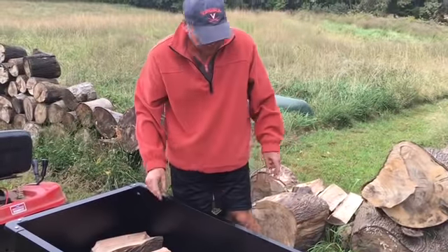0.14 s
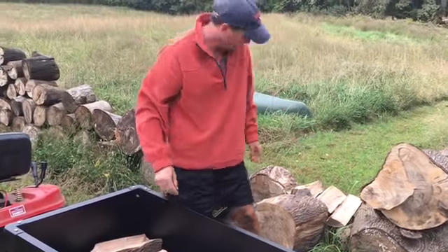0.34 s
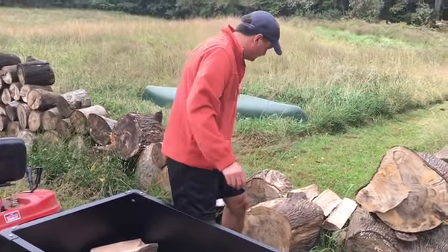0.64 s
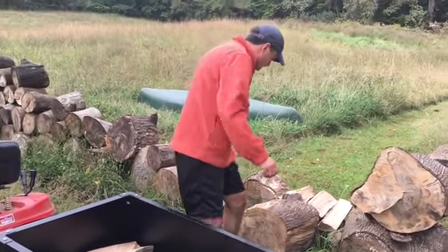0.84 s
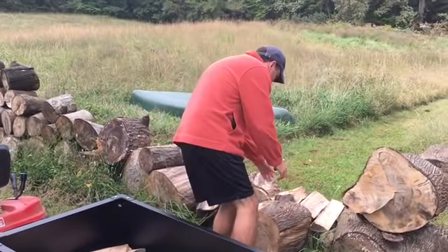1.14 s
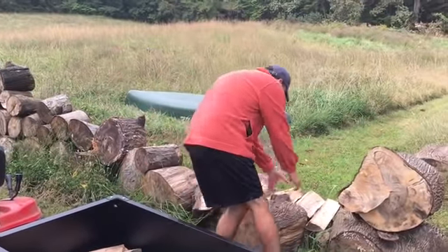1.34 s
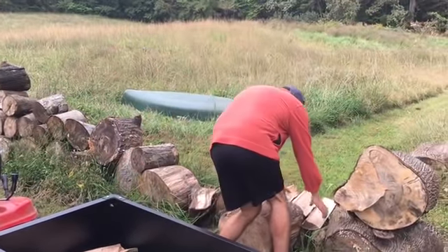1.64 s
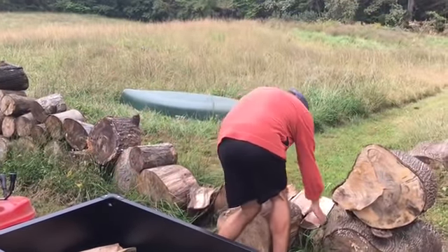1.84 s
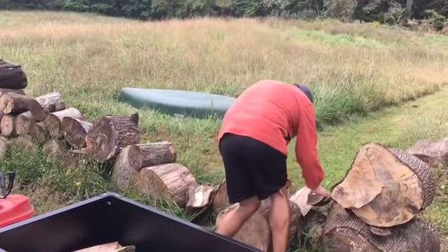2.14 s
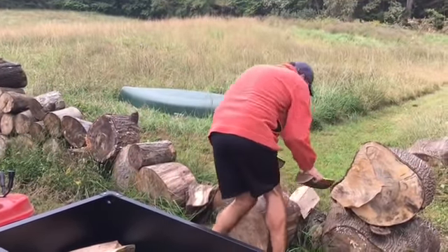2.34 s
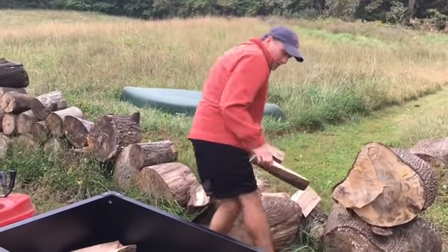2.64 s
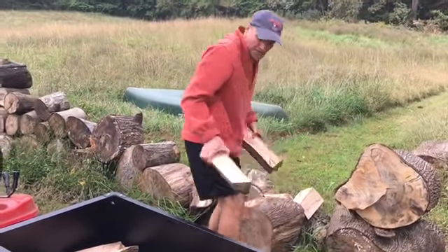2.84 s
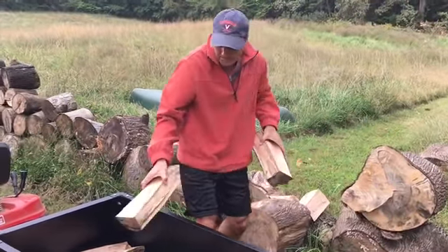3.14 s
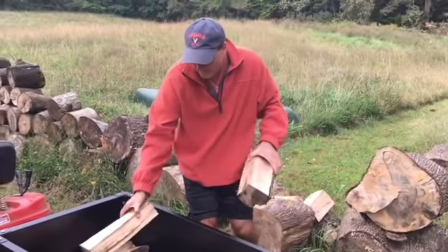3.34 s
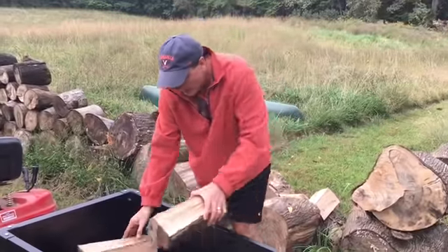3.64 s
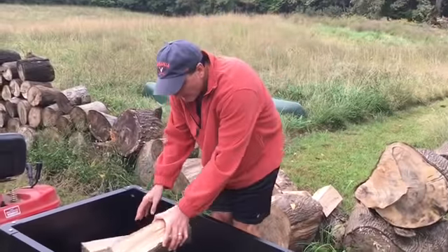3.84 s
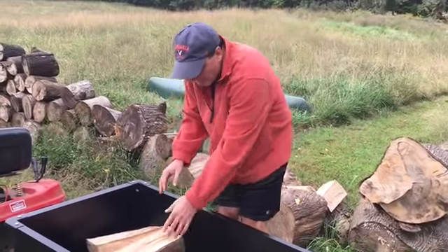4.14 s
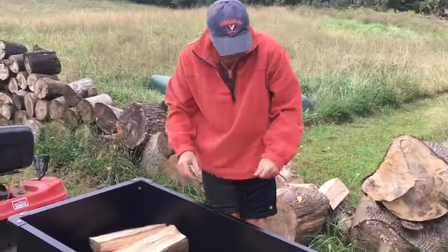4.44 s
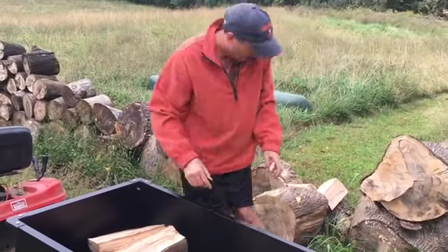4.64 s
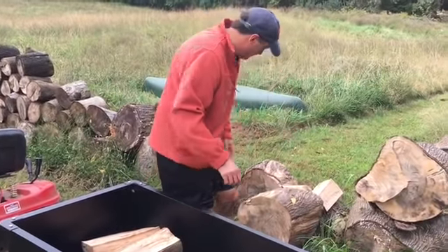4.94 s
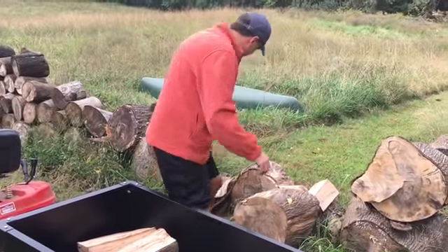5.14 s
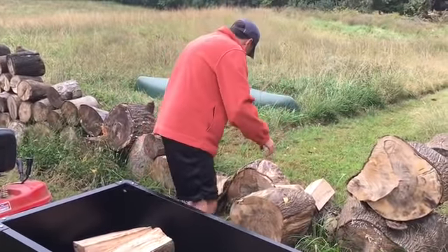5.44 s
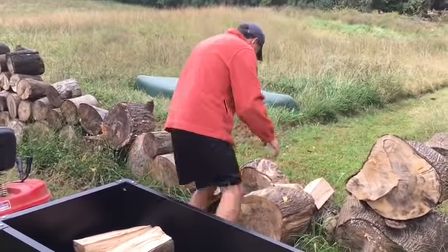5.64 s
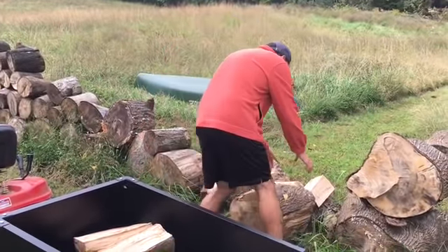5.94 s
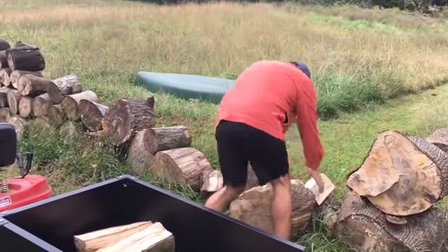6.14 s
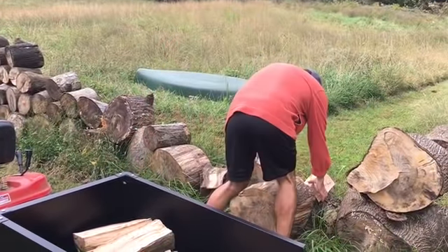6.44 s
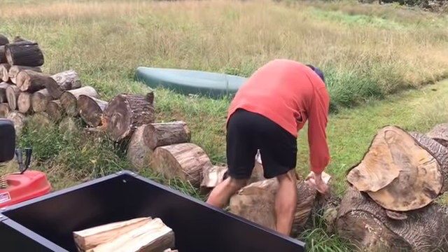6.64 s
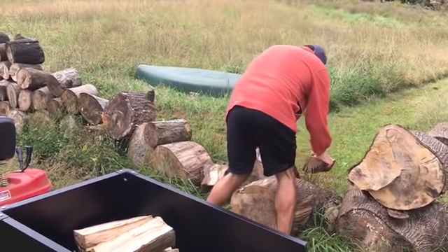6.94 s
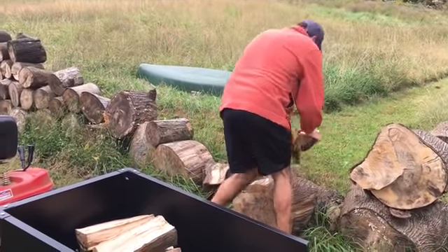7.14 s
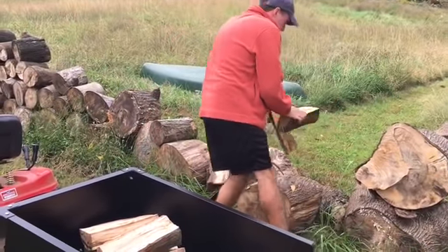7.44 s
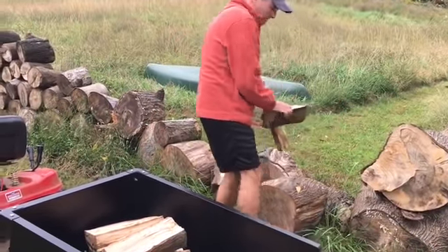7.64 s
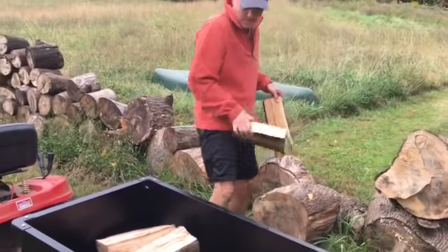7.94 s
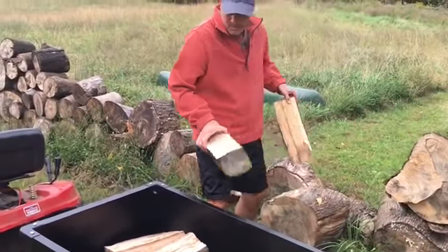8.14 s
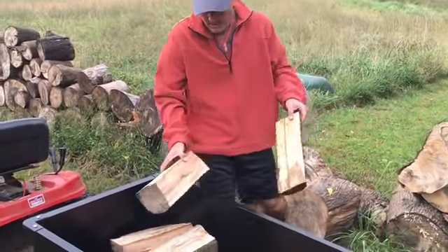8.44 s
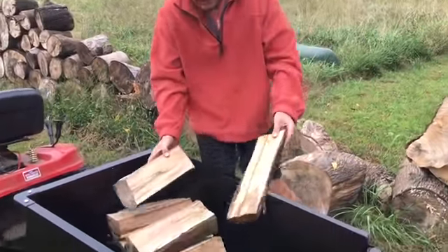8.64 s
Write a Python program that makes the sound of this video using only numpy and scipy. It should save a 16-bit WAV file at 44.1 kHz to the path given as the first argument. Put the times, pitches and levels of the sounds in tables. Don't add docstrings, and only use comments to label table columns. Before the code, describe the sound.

Two split logs drop into a steel cart with heavy booming clangs, then wood knocks, grass rustle, crickets and scattered bird calls outdoors.

```python
import sys
import numpy as np
from scipy import signal
from scipy.fft import rfft, irfft, next_fast_len
from scipy.io import wavfile
from scipy.ndimage import map_coordinates

SR = 44100
rng = np.random.default_rng(int(sys.argv[2]) if len(sys.argv) > 2 else 0)


def unload_wav(signal):
    wavfile.write(
        sys.argv[1],
        SR,
        np.round(np.clip(np.atleast_2d(signal).T, -1, 1) * 32767).astype(np.int16),
    )


def amp(db):
    return 10 ** (np.asarray(db, float) / 20)


N = 387638


def rms_one(x):
    return x / np.sqrt(np.mean(x ** 2) + 1e-20)


def at_hz(points, hz):
    table_hz, values = np.array(points).T[:2]
    return np.interp(np.log(hz), np.log(table_hz), values)


def in_time(rows):
    s, *columns = np.transpose(rows)
    return [np.interp(np.arange(N) / SR, s, column) for column in columns]


def gate(rows, fade=0.0027):
    t = np.arange(N) / SR
    start, end = rows[0][0], rows[-1][0]
    return np.clip(np.minimum(t - start + (start == 0), end - t) / fade, 0, 1)


def coloured(x, spectrum):
    size = next_fast_len(N)
    hz = np.maximum(np.arange(size // 2 + 1) * SR / size, 1)
    return rms_one(irfft(rfft(x, size) * amp(at_hz(spectrum, hz)), size)[:N])


def drift(rate):
    knots = rng.standard_normal(400)
    return map_coordinates(knots, [np.arange(N) / SR * rate], order=3, mode="wrap")


def grains(per_s, spread_db):
    sizes = amp(spread_db * np.minimum(rng.exponential(1, N), 5)) * rng.choice([-1, 1], N)
    return sizes * (rng.random(N) < per_s / SR)


def ring(clicks, hz, t60):
    r, w = amp(-60 / (t60 * SR)), 2 * np.pi * hz / SR
    return signal.lfilter([0, np.sin(w)], [1, -2 * r * np.cos(w), r * r], clicks + 1e-18)


def bands(x, low_hz, per_octave=3):
    steps = np.arange(per_octave * np.log2(16000 / low_hz) + 1)
    edges = low_hz * 2 ** (steps / per_octave)
    for k, (low, high) in enumerate(zip(edges, edges[1:])):
        sign = (-1) ** k
        sos = signal.butter(2, [low, high], "band", fs=SR, output="sos")
        yield np.sqrt(low * high), sign * signal.sosfilt(sos, x)


def echoes(x, level_db, t60):
    t = np.arange(SR // 2) / SR
    tail = rng.standard_normal(len(t)) * amp(-60 * t / t60) * (t > .01)
    return x + amp(level_db) * signal.fftconvolve(x, tail / np.sqrt(np.sum(tail ** 2)))[:N]


# f/Hz, level/dB per Hz
AIR_SPECTRUM = [(13, -42), (22, 0), (143, 3), (217, -10), (278, -9), (469, -25), (1760, -29), (2660, -36.5),
                (3510, -25), (4370, -36.5), (5920, -26), (7800, -22), (8480, -28), (10300, -38.5),
                (16000, -33)]


def air(level_db=-41):
    floor = coloured(rng.standard_normal(N), AIR_SPECTRUM)
    lows = signal.sosfilt(signal.butter(2, 350, fs=SR, output="sos"), floor)
    lumps = amp(1.5 * drift(7.0) + 1.0 * drift(1.5)) - 1
    return amp(level_db) * (floor + lows * lumps)


# f/Hz, width/Hz, level/dB
FAR_INSECTS = [(5944, 590, -58), (7250, 290, -62), (7800, 80, -79)]


def chorus():
    out = 0
    for hz, width, db in FAR_INSECTS:
        b, a = signal.butter(1, [hz - width / 2, hz + width / 2], "band", fs=SR)
        band = signal.lfilter(b, a, signal.lfilter(b, a, rng.standard_normal(N)))
        out = out + amp(db + 2.2 * drift(13.0)) * rms_one(band)
    return out


def trill(level_db=-50, per_s=53.9, duty=0.6):
    turn = (np.cumsum(per_s + .15 * drift(1.5)) / SR + .45) % 1 / duty
    arch = np.sin(np.pi * np.minimum(turn, 1))
    hz = 8200 + 450 * arch + 30 * drift(45)
    return amp(level_db + 0.45 * drift(2.97)) * arch * np.sin(2 * np.pi * np.cumsum(hz) / SR)


# t/s, thud level/dB, ring level/dB, brightness/dB per octave
LOG_BLOWS = [(0.0, -54, -33.5, 1), (3.650, -31.5, -36.5, -1.5), (3.663, -31.5, -47, 0.5),
             (3.693, -38, -28.5, -4.5), (3.734, -17.5, -91, -6), (3.751, -25, -27, -0.5),
             (3.769, -11.5, -28.5, -5.5), (3.785, -46, -72, 3.5), (3.81, -23, -29.5, -4),
             (3.959, -47, -30.5, -14), (4.085, -17.5, -28, 1), (4.092, -16, -30.5, 0),
             (4.112, -6.5, -33.5, -1), (4.148, -22.5, -39, 2), (4.174, -14.5, -29, -1.5),
             (4.215, -20, -26.5, -1.5), (4.254, -21, -27, -1), (4.29, -54, -35, 4.5),
             (4.345, -23.5, -32.5, -2), (4.43, -50, -31.5, -1)]


def blow_clicks(hz, level_db):
    s, thud_db, ring_db, bright = np.transpose(LOG_BLOWS)
    clicks = np.zeros((2, 6 * SR))
    strength_db = np.array([ring_db, thud_db]) + level_db + bright * np.log2(hz / 200)
    clicks[:, np.round(s * SR).astype(int)] = amp(strength_db)
    return clicks


BED_MODE_HZ = [162, 199, 269, 296, 382, 404, 544, 576, 515, 781, 905, 1050, 1071, 1245, 1394, 1518, 1545,
               1642, 1690, 1733, 1798, 1838, 2121, 2170, 2288, 2428, 2503, 3865, 4054]
# level/dB under the first, second and last log, t60/s
BED_MODES = [(6.5, 0, 0.5, 0.75), (-24, -6, -6, 0.7), (-5, -32, -2, 1.2), (-4, -9, -8, 1.1),
             (-6, 0, -9, 0.9), (0, -11, -2, 1.4), (-6, -15, -16, 1.3), (-16, -13, -30, 1.9),
             (-20, -14, -12, 1.5), (-18, -43, -34, 2), (-21.5, -22, -29, 1.6), (-33, -30, -25.5, 1.8),
             (-15.5, -45, -40, 1.4), (-24, -42, -41, 2.8), (-36, -38, -21, 1.2), (-4, -44, -14, 1.1),
             (-19, -42, -31, 1.2), (-21, -33, -29, 1.2), (-21, -25, -22, 1.4), (-12, -22, -26, 1.1),
             (-24, -31, -36, 3.2), (-26, -4, -13, 1), (-16, -44, -24, 1.6), (-23, -21, -13, 0.8),
             (-31, -29, -35, 2.2), (-4, -9, -14, 0.55), (-42, -28, -23, 0.8), (-32, -31, -22, .4),
             (-35, -35, -27, .55)]
# f/Hz, level/dB
SHEET_LEVEL = [(29, -48), (50, -13.5), (119, -13), (176, 0), (229, -7), (266, -2), (649, -17.5),
               (1840, -20.5), (2610, -25.5), (3940, -32.5), (9000, -48), (11700, -73), (19800, -120)]
# f/Hz, t60/s
SHEET_DECAY = [(60, 1), (200, 1), (600, 1), (2000, 0.67), (4000, 0.69), (9000, 0.22)]


def cart(damped=0.2, scatter_db=4.0, contact=0.0035):
    last_log_s, waver_per_s = 4.0, 20
    out, at = np.zeros(N), [round(row[0] * SR) for row in LOG_BLOWS]
    first, second = at[0], slice(at[0] + 1, round(last_log_s * SR))
    modes = [(hz, *row) for hz, row in zip(BED_MODE_HZ, BED_MODES)]
    for hz in np.geomspace(70, 800, 52) * amp(rng.normal(0, 0.1414, 52)):
        weak_db = at_hz(SHEET_LEVEL, hz) - np.log2(hz / 200)
        modes.append((hz, weak_db, weak_db, weak_db, 0.98 * at_hz(SHEET_DECAY, hz)))
    chance = rng.standard_normal((len(at), len(modes), 2))
    coarse_s = np.arange(6 * SR // 64 + 1) * 64 / SR
    rocking = map_coordinates(chance[1:].ravel(), [coarse_s * waver_per_s], order=3)
    for k, (hz, first_db, second_db, later_db, t60) in enumerate(modes):
        clicks = blow_clicks(hz, later_db)
        luck = chance[:, k]
        clicks[:, at] *= (amp(scatter_db * (np.abs(luck) + 0.2)) * np.sign(luck)).T
        clicks[:, first] *= amp(first_db - later_db)
        clicks[:, second] *= amp(second_db - later_db)
        clicks[0, second] *= amp(-10 * (hz < 230))
        free, held = ring(clicks, hz, contact) * 2 * np.log(1000) / (contact * SR)
        depth_db = 1.5 if k < len(BED_MODES) else 3.5
        waver = np.repeat(amp(depth_db * (np.roll(rocking, 53 * k) - .5)), 64)[:6 * SR]
        thud = ring(held, hz, damped * at_hz(SHEET_DECAY, hz))
        out[:6 * SR] += waver * ring(free, hz, t60) + thud
    return signal.sosfilt(signal.butter(2, 95, "high", fs=SR, output="sos"), out)


def sheet_lines(count=500, blur_db=-5):
    spectrum = np.zeros(3 * SR + 1, complex)
    lines = (6 * rng.uniform(650, 6000, count)).astype(int)
    spectrum[lines] = rng.standard_normal(count) + 1j * rng.standard_normal(count)
    return 0.17 * rms_one(irfft(spectrum)) + amp(blur_db) * rng.standard_normal(6 * SR)


def clang(level_db=8, damped=0.27, rise=0.00034):
    out, swell = np.zeros(N), np.exp(-1 / (rise * SR))
    for hz, noise in bands(sheet_lines(), 315.0):
        band_db = at_hz(SHEET_LEVEL, hz) + level_db - 2 * (hz < 630)
        free, held = blow_clicks(hz, band_db) ** 2 + 1e-30
        fall = amp(-120 / (at_hz(SHEET_DECAY, hz) * SR))
        energy = signal.lfilter([1], [1, -fall], free)
        energy += signal.lfilter([1], [1, -fall ** (1 / damped)], held)
        energy = signal.lfilter([1 - swell], [1, -swell], energy)
        out[:6 * SR] += np.sqrt(energy * SR / 200) * noise
    return out


# f/Hz, level/dB per Hz
RATTLE_SPECTRUM = [(900, -14), (1700, -5), (2400, -5), (2900, -11), (3600, -6), (4050, 1), (4550, -7),
                   (6300, -5.5), (11000, -9), (16000, -16)]
# t/s, level/dB, t60/s, top against it/dB
WALL_JOLTS = [(0.0, -40, 0.3, -17), (3.645, -38, 0.14, -3), (3.702, -50.5, 0.29, 8), (3.735, -40, 0.08, 0),
              (3.745, -39, 0.033, 5), (3.752, -46, 1, -25), (3.771, -35.5, 0.081, -23),
              (4.084, -28, 0.18, -13), (4.106, -17.5, 0.057, -5), (4.13, -28, 0.77, -7),
              (4.146, -31.5, 0.26, -1), (4.183, -37, 0.36, -9), (4.232, -26.5, 0.43, -12),
              (4.28, -26, 0.3, -2.5), (4.341, -48.5, 0.14, -39)]


def rattle(rise_s=0.0042, settle=0.98, top_fall_db_per_s=106, top_floor_db=-45):
    contacts = grains(12000, spread_db=3.0) * amp(2.5 * drift(60))
    contacts = coloured(contacts, RATTLE_SPECTRUM)[:5 * SR]
    out, t = np.zeros(N), np.arange(SR // 2) / SR
    parts = list(bands(contacts, 1020, per_octave=2))
    for s, db, t60, top_db in WALL_JOLTS:
        i, on = round(s * SR), np.minimum(t / rise_s + (s == 0), 1)
        top = np.maximum(top_db - top_fall_db_per_s * t, top_floor_db)
        for hz, band in parts:
            share = np.log2(hz / 4800) / 1.36 * (hz > 4800)
            piece = band[i:i + len(t)]
            level = on * amp(db + 5.5 - 60 * (t / t60) ** settle + share * top)
            out[i:i + len(piece)] += piece * level[:len(piece)]
    return out


# t/s of the last pulse of a chirp, pulses
CRICKET_CHIRPS = [(.3155, 6), (.6473, 7), (.9616, 7), (1.262, 6), (1.5913, 6), (1.8923, 6), (2.1926, 6),
                  (2.5059, 6), (2.8140, 6), (3.1415, 7), (3.4592, 6), (3.77, 6), (4.0704, 6), (4.40, 6),
                  (4.7084, 6), (5.0146, 6), (5.31, 6), (5.6178, 6), (5.9229, 6), (6.2469, 7), (6.5322, 6),
                  (6.8327, 7), (7.1285, 7), (7.4396, 6), (7.7622, 6), (8.0567, 6), (8.3536, 6), (8.6635, 6)]


def tree_cricket(level_db=-45, top_hz=3820, fall_hz=620, length=0.01875):
    out, t = np.zeros(N), np.arange(round(length * SR)) / SR
    hz = top_hz - fall_hz * (t / length) ** 1.72
    pulse = np.sin(np.pi * (t / length) ** 1.65) * np.sin(2 * np.pi * np.cumsum(hz) / SR)
    chance = rng.standard_normal((len(CRICKET_CHIRPS), 9))
    for (last, count), luck in zip(CRICKET_CHIRPS, chance):
        for k in range(count):
            i = round((last - .0075 - .0228 * (count - 1 - k)) * SR)
            place = k + 6 - count
            swell_db = -6 * .3 ** place ** 2 - 4 * (place < 0)
            out[i:i + len(t)] += amp(level_db + swell_db + luck[k] + .7 * luck[-1]) * pulse
    return echoes(out, -44.5, 0.079)


# t/s of the peak, half length/s, swish level/dB, scuff level/dB
GRASS_MOVES = [(0.406, 0.2, -49.5, -53.5), (0.953, 0.21, -62, -61), (1.414, 0.2, -49.5, -56),
               (2.014, 0.32, -59.5, -59.5), (2.085, 0.059, -58, -66), (7.04, 0.064, -64, -96),
               (2.445, 0.1, -61, -61.5), (2.85, 0.12, -48, -62), (3.085, 0.38, -58.5, -58),
               (3.626, 0.1, -50, -57), (4.066, 0.014, -40, -53), (4.904, 0.21, -53, -56),
               (6.416, 0.013, -54, -72), (6.623, 0.022, -51.5, -78), (5.953, 0.15, -52.5, -58),
               (6.958, 0.044, -63, -51.5), (7.172, 0.25, -52, -62), (7.696, 0.13, -49.5, -55.5),
               (8.302, 0.16, -61, -56), (8.6, 0.21, -50, -53)]
# f/Hz, level/dB per Hz
SWISH_SPECTRUM = [(1500, -4), (2500, -3.5), (4500, 1), (7000, 1), (10000, -4), (15500, -5.5)]
# f/Hz, level/dB per Hz
SCUFF_SPECTRUM = [(300, 9), (600, 1), (1000, 9), (1800, 8), (2600, 2.5), (4000, -85)]


def rustle():
    stems = grains(6000, spread_db=2.5) * amp(1.8 * drift(25))
    swish = coloured(stems, SWISH_SPECTRUM)
    scuff = coloured(np.roll(stems, SR), SCUFF_SPECTRUM)
    s, half, swish_db, scuff_db = np.transpose(GRASS_MOVES)
    t = np.arange(0, N + 100, 100) / SR
    moves = amp(-9 * np.abs((t[:, None] - s) / half) ** 1.9)
    high = np.interp(np.arange(N) / SR, t, moves @ amp(swish_db))
    low = np.interp(np.arange(N) / SR, t, moves @ amp(scuff_db + 2.5))
    return high * swish + low * scuff


# t/s, peak level/dB, low push/dB, top crack/dB, strongest mode f/Hz
LOG_KNOCKS = [(0.97, -47.5, -4, 1, 1240), (2.002, -38, -28, 9, 2120), (2.0052, -43, -23, 7, 1170),
              (2.0222, -33.5, -38, 10, 1160), (2.049, -45, -20, -8, 1030), (2.069, -42, -24, -8, 1300),
              (2.093, -41, -16, -5, 1310), (2.112, -55, 20, -12, 135), (2.136, -42, -17, 2, 980),
              (2.1678, -45, 8.5, -17, 680), (3.504, -40, -21, -7, 1480), (4.994, -42.5, 0.5, 8, 1410),
              (5.5451, -40, -3, 7, 1280), (6.0523, -43, 8.5, 9, 1194), (6.9285, -52, -15, 14, 830),
              (6.966, -45, 1, -2, 1160), (6.9827, -41.5, 2, 6, 760), (7.2446, -19, -2.5, -2, 2070),
              (7.276, -40, -18, 7, 1520), (7.282, -35.5, -11, -15, 1190), (7.3357, -48, -8, -6, 1340),
              (7.617, -24.5, 5.5, -1, 1050), (7.6337, -28, -7, -4, 1700)]
# t/s, peak level/dB, top crack/dB, strongest mode f/Hz
BARK_TICKS = [(1.3096, -50, 0, 1190), (1.6653, -47.5, 9, 1150), (1.6802, -54, 21, 785),
              (1.89, -39.5, 6, 2250), (1.9645, -61, 9, 1360), (1.988, -48, 21, 2270),
              (2.145, -48, 11, 4500), (2.3934, -52, 5, 1270), (2.7132, -36, -19, 2220),
              (2.9632, -50, 3, 2060), (5.013, -42, 11, 1660), (6.953, -43, 7, 1700),
              (7.022, -39, 8.5, 4000), (7.044, -50, 0, 1690), (7.085, -44, 7, 1700), (7.112, -52, -4, 2270),
              (7.7266, -56, -5, 1070), (7.805, -45, 11, 2520), (8.116, -47, -5, 3220),
              (8.522, -47, -4, 1510)]


def knocks(t60=0.055, main_t60=0.032, main_db=6.5):
    out, t = np.zeros(N + 4000), np.arange(4000) / SR
    rows = [(s, db, push_db, -5.5 + 0.048 * push_db, *rest) for s, db, push_db, *rest in LOG_KNOCKS]
    rows += [(s, db, -29, -23, *rest) for s, db, *rest in BARK_TICKS]
    chance = rng.random((len(rows), 90))
    hiss = rng.standard_normal((len(rows), 4000))
    hiss = signal.sosfilt(signal.butter(2, 2600, "high", fs=SR, output="sos"), hiss)
    hiss = signal.sosfilt(signal.butter(1, 7000, fs=SR, output="sos"), hiss)
    for (s, db, push_db, body_db, crack_db, main_hz), luck, snap in zip(rows, chance, hiss):
        hz = np.geomspace(130, 5500, 45) * amp(0.74 * luck[:45])
        balance = [(130, push_db), (320, push_db), (950, body_db), (2100, 0.0079), (5500, crack_db - 9.5)]
        size = amp(at_hz(balance, hz) - 9.5)
        size *= 1 - np.exp(-(np.log2(hz / main_hz) / 0.15) ** 2)
        phase = luck[45:] * np.minimum(hz / 500, 1)
        decay = amp(-60 * t / t60 * (hz[:, None] / 1000) ** 0.46)
        body = size @ (decay * np.sin(2 * np.pi * (hz[:, None] * t + phase[:, None])))
        main_level = amp(main_db - 60 * t / main_t60 * np.sqrt(main_hz / 1000))
        body += main_level * np.sin(2 * np.pi * main_hz * t)
        crack = amp(crack_db - 0.5) * snap * amp(-60 * t / 0.03)
        i = round(s * SR)
        out[i:i + 4000] += amp(db) * (body + crack) * np.minimum(t / .0014, 1)
    return out[:N]


def voice(calls, partials, base, rough, buzz_hz):
    out, flutter = np.zeros(N), drift(30)
    buzz = 1 + rough * np.sin(2 * np.pi * np.cumsum(buzz_hz * (1 + 0.155 * flutter)) / SR)
    for rows in calls:
        hz, level_db = in_time(rows)
        span = slice(round(rows[0][0] * SR), round(rows[-1][0] * SR))
        shape = (np.sqrt(2) * gate(rows) * amp(level_db) * buzz)[span]
        fill = np.linspace(1, 0, num=len(shape)) ** 2
        for multiple, db, late_db in partials:
            own_flutter = np.roll(flutter, int(multiple) * SR)[span] * (db != 0)
            flicker = amp(db - late_db * fill + (3.0 + 0.09 * late_db) * own_flutter)
            out[span] += shape * flicker * np.sin(2 * np.pi * np.cumsum(hz[span] * multiple / base) / SR)
    return out


def jay_call(s, length, db, last_hz, strain):
    start_hz, top_hz = 3275, 3443 - 35 * strain
    u = np.linspace(0, 1, num=40)
    t = u * length
    scoop_hz = (top_hz - start_hz) * np.exp(-(t / 0.0222) ** 3)
    sag_hz = (top_hz - last_hz) * u ** 2.2
    dip = 13.5 * strain * np.exp(-((u - 0.19) / 0.3) ** 2)
    edge = 18 * np.clip(1 - np.minimum(0.32 * t, length - t) / 0.0063, 0, 1)
    return np.transpose([s + t, top_hz - scoop_hz - sag_hz, db - dip - edge - 13 * u ** 2])


# t/s, length/s, level/dB, last f/Hz of the fourth partial, strain 0-1
JAY_CALLS = [
    (0.981, 0.31, -43.5, 3134, 0.9),
    (3.328, 0.36, -44, 3150, 0.55),
    (6.481, 0.35, -44.5, 3140, 0.63),
    (8.402, 0.335, -48.5, 3273, 0.11),
]
# multiple, level/dB, held back at the start/dB
JAY_HARMONICS = [(2, -11.5, -3), (3, -11, 11), (4, 4.5, -1.5), (5, -10, 33), (6, -9, 7), (7, -8.5, 7)]


def jay():
    out = 0
    for call in JAY_CALLS:
        strain = call[-1]
        partials = [(multiple, db, late_db) for multiple, db, late_db in JAY_HARMONICS]
        out = out + voice([jay_call(*call[:-1], strain)], partials, base=4, rough=.3, buzz_hz=70)
    return echoes(out, -6.5, .5)


# t/s, length/s, level/dB
CROW_CALLS = [
    (1.726, 0.16, -49.5),
    (2.177, 0.14, -48),
    (2.612, 0.168, -48.5),
]
# share of the length, f/Hz, level/dB
CAW_ARCH = [(0, 1190, -9), (0.13, 1330, 0), (0.31, 1500, -5), (0.56, 1410, -3), (0.83, 1295, -5.5),
            (1, 1245, -12.5)]


def crow():
    caws = [[(s + u * length, hz, db + shape_db) for u, hz, shape_db in CAW_ARCH]
            for s, length, db in CROW_CALLS]
    out = voice(caws, [(1, -15, 0), (2, 0, 0), (3, -26, 0)], base=2, rough=.65, buzz_hz=90)
    hill_echo_s, hill_echo_db = 0.073, -7
    out = out + amp(hill_echo_db) * np.roll(out, round(hill_echo_s * SR))
    return echoes(out, -4, .8)


# t/s, peak level/dB, centre f/Hz
SPLINTERS = [(1.8925, -14, 6750), (1.925, -22, 6000), (1.9318, -35, 4500), (2.0235, -15, 4500),
             (2.037, -17, 3900), (2.0419, -22, 3900), (2.716, -24, 3430), (2.8375, -21, 6000),
             (3.5032, -11.5, 3070), (4.1118, 0, 3000), (4.9967, -38, 3545), (5.0157, -27, 2810),
             (5.548, -30, 3050), (6.0556, -41, 4000), (6.9888, -24, 3000), (7.0888, -34, 3000),
             (7.1123, -29, 3500), (7.637, -10, 5200), (8.103, -39, 5000), (8.526, -36, 3000),
             (8.5327, -38, 3000), (8.5529, -41, 4000)]


def snaps(cycles=3.3):
    out, t = np.zeros(N), np.arange(200) / SR
    for s, db, hz in SPLINTERS:
        i = round(s * SR)
        out[i:i + len(t)] += amp(db - 2.5 - 60 * t * hz / (2 * cycles)) * np.sin(2 * np.pi * hz * t)
    return out


# t/s, level/dB
BARK_SLIDES = [
    [(1.974, -56), (1.986, -38), (1.997, -51)],
    [(1.998, -41), (2.007, -33.5), (2.015, -50)],
    [(7.13, -74), (7.208, -40), (7.236, -52), (7.25, -47)],
]


def scrape():
    spectrum = [(1500, -14), (3500, -29), (5200, 0), (6800, 1), (8200, -6), (11000, -13.5)]
    hiss = coloured(grains(17000, spread_db=4.0), spectrum)
    return sum(gate(rows, 0.0025) * amp(in_time(rows)[0]) for rows in BARK_SLIDES) * hiss


# t/s, peak level/dB, f/Hz, t60/s
WOOD_HOLLOWS = [
    (2.111, -30, 140, 0.04),
    (3.7342, -4.5, 174, 0.089),
    (2.168, -32.5, 344, 0.079),
    (7.2454, -12.5, 226, 0.033),
    (7.2555, -31, 1720, 0.063),
    (7.6161, -9, 418, 0.023),
    (7.618, -26, 970, 0.068),
]


def hollows():
    out, t = np.zeros(N), np.arange(4000) / SR
    for s, db, hz, t60 in WOOD_HOLLOWS:
        i = round(s * SR)
        swell = np.minimum(t / .001, 1)
        out[i:i + len(t)] += amp(db - 60 * t / t60) * swell * np.sin(2 * np.pi * hz * t)
    return out


# t/s, peak level/dB
LATCH_TOUCHES = [(4.109, -26), (4.14, -22), (4.1577, -21), (4.1875, -19), (4.2286, -15), (4.24, -9.5),
                 (4.2694, -24), (4.2883, -21), (4.299, -9), (4.341, -15.5), (4.424, -24), (4.4444, -22),
                 (4.4675, -26)]
# f/Hz, level/dB, t60/s
LATCH_TONES = [(3630, -3, 0.045), (3820, 1, 0.056), (4080, 4, 0.05), (4230, -10, 0.054), (4500, -23, 0.037)]


def latch(trim_db=-14):
    out, (s, db) = np.zeros(N), np.transpose(LATCH_TOUCHES)
    chance = rng.standard_normal((len(LATCH_TONES), len(s)))
    for (hz, level_db, t60), luck in zip(LATCH_TONES, chance):
        clicks = np.zeros(5 * SR)
        clicks[np.round(s * SR).astype(int)] = amp(db + level_db + trim_db + 1.8 * luck)
        out[:5 * SR] += ring(clicks, hz, t60)
    return out


# t/s, length/s, first f/Hz, last f/Hz, level/dB
WHISTLE_NOTES = [
    (7.897, 0.074, 1925, 1985, -65),
    (7.97, 0.14, 1990, 1985, -57),
    (8.11, 0.1, 1945, 1900, -64),
    (8.205, 0.19, 1950, 1950, -58),
    (8.14, 0.13, 2360, 2340, -68),
    (8.41, 0.07, 1440, 1430, -60),
]


def whistle():
    arch = [(0, -9), (0.3, 0), (0.75, 2.5), (1, -15)]
    notes = [[(s + u * length, hz + u * (last_hz - hz), db + shape_db) for u, shape_db in arch]
             for s, length, hz, last_hz, db in WHISTLE_NOTES]
    return echoes(voice(notes, [(1, 0, 0)], base=1, rough=.05, buzz_hz=49), -6.5, .5)


def scene():
    steel = echoes(cart() + clang() + rattle() + latch(), -12.0, 0.3)
    wood = echoes(knocks() + hollows() + scrape() + snaps(), -21, 0.12)
    insects = tree_cricket() + trill() + chorus()
    birds = jay() + crow() + whistle()
    return (steel + wood + rustle() + insects + birds + air())[None]


def roll_off(x):
    return signal.sosfilt(signal.butter(12, 16130, fs=SR, output="sos"), x)


def record(dry):
    heard = signal.sosfilt(signal.butter(4, 40, "high", fs=SR, output="sos"), dry)
    return roll_off(np.clip(heard, -1.01, 1.01))


dry = scene()
out = record(dry)
unload_wav(out)
```